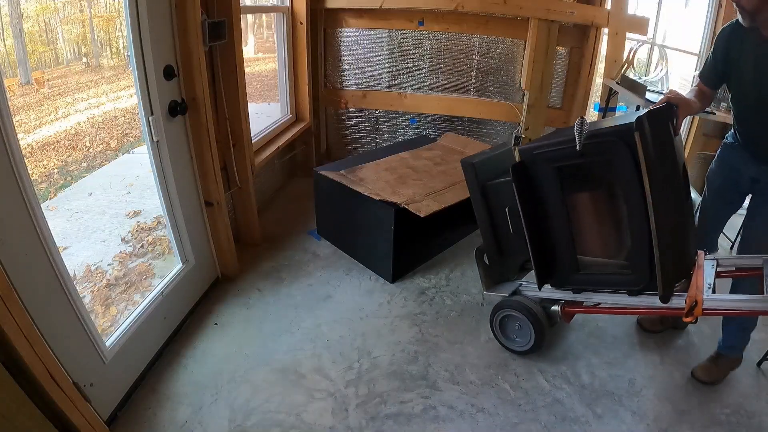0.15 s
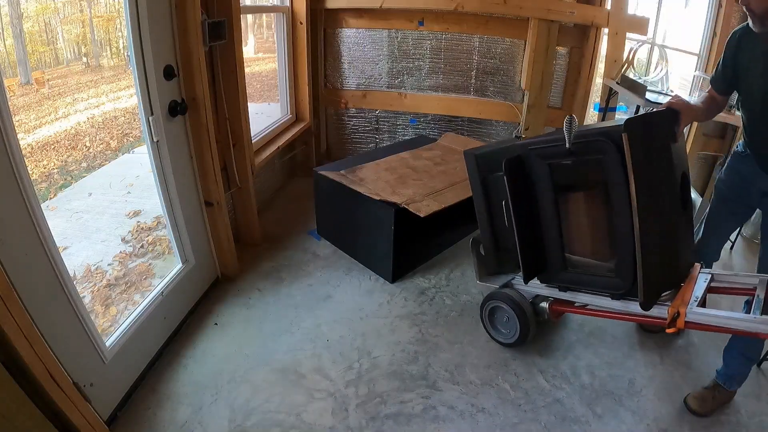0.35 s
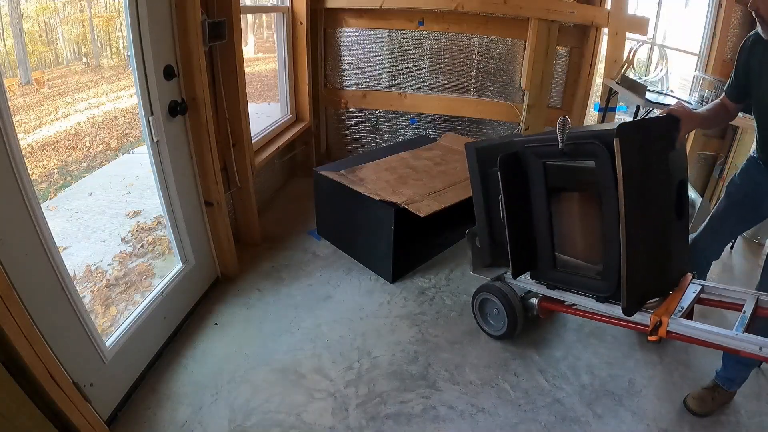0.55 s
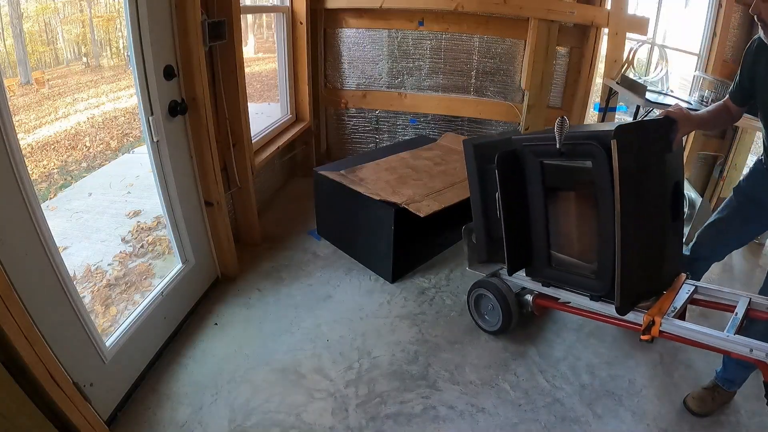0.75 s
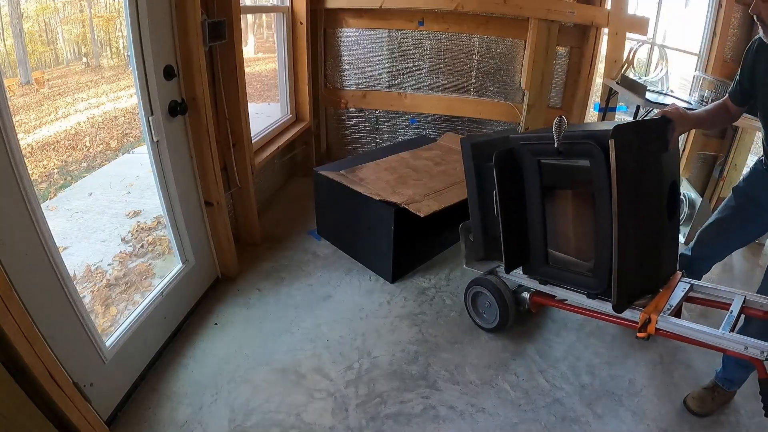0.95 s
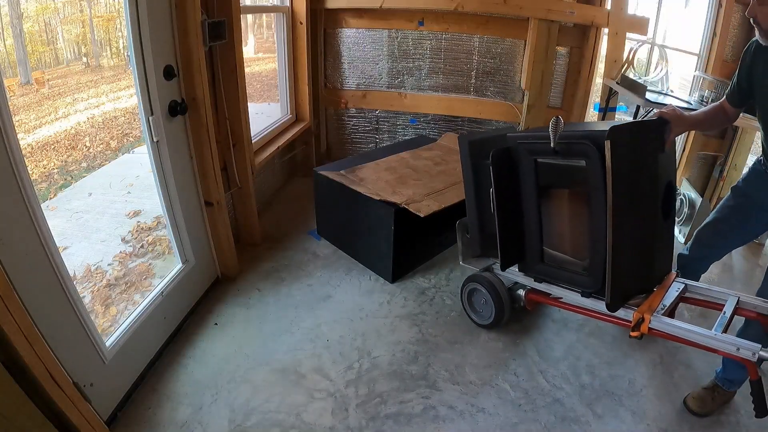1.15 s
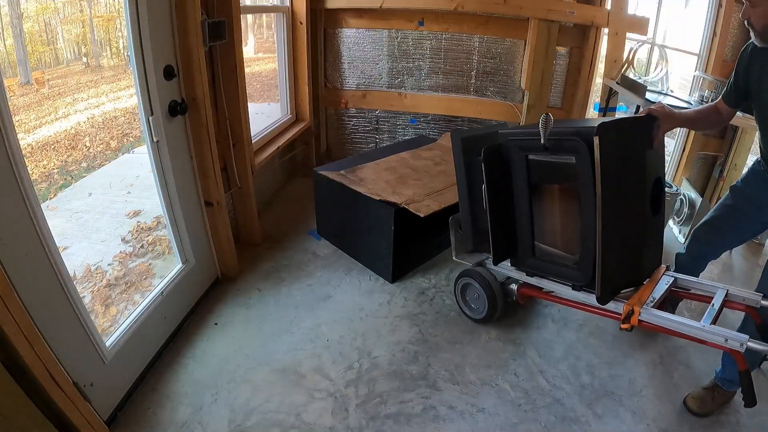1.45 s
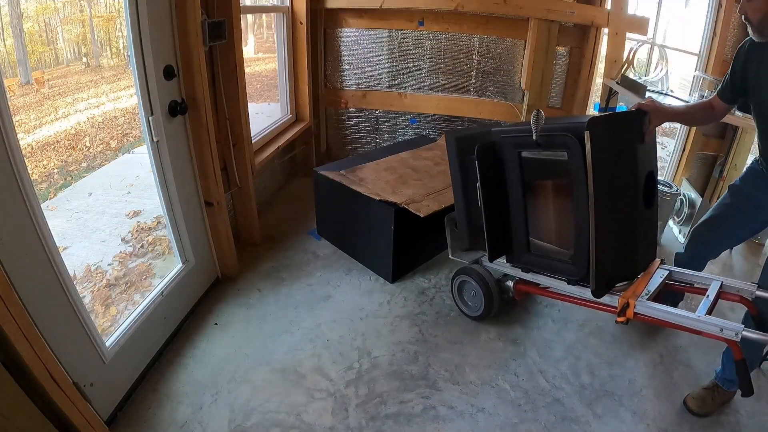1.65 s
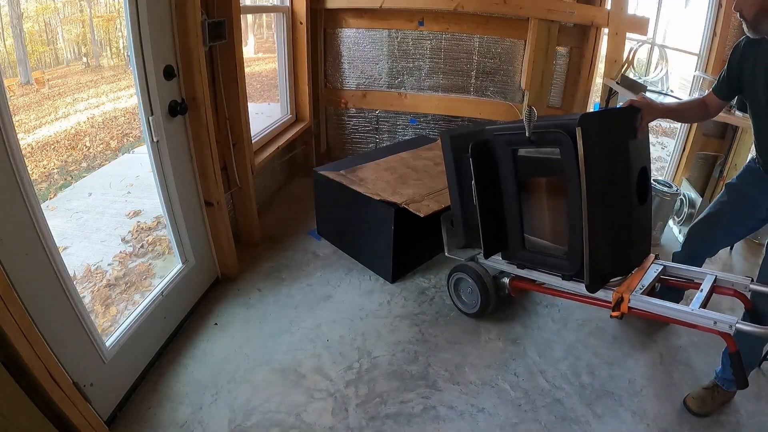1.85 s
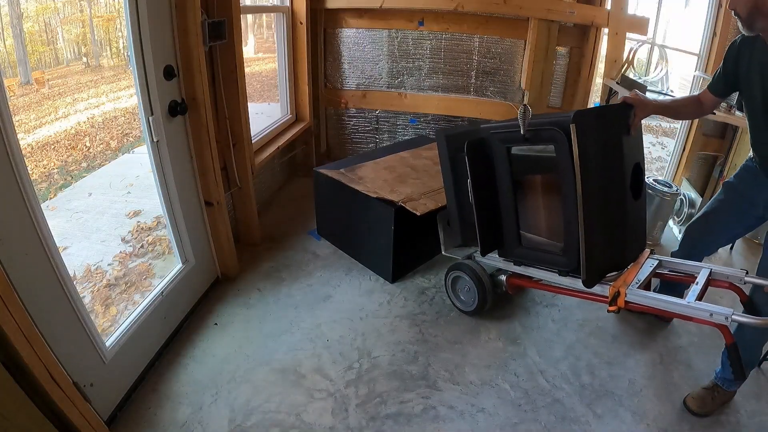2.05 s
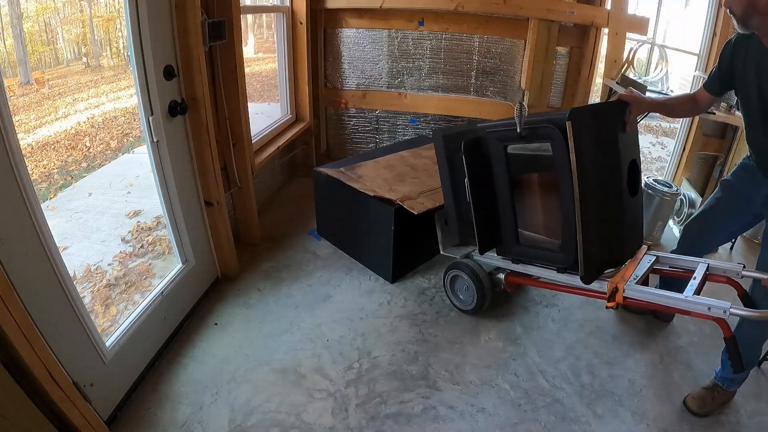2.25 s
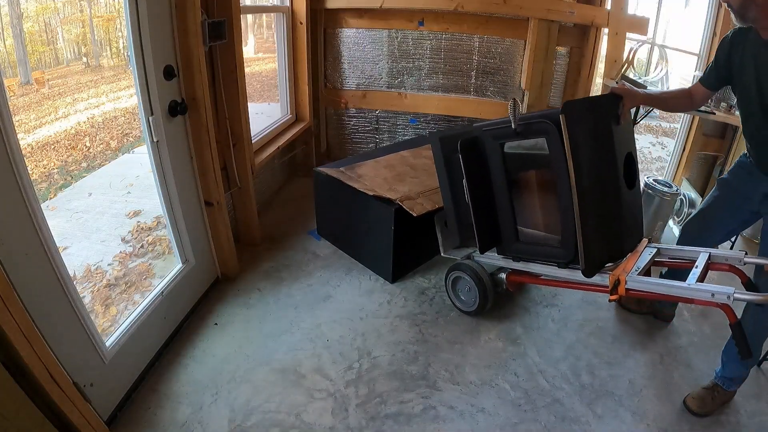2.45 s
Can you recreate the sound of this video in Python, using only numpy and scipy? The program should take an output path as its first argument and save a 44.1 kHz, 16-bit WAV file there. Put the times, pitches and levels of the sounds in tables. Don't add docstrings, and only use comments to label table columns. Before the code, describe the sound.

A loaded hand truck scrapes and rumbles on concrete, its iron load clanking, over a low hum

```python
import sys
import numpy as np
from scipy import signal
from scipy.fft import rfft, irfft
from scipy.io import wavfile
from scipy.ndimage import uniform_filter1d

SR = 44100
rng = np.random.default_rng(int(sys.argv[2]) if len(sys.argv) > 2 else 0)


def magnitude_from_level(level_db):
    exponent = np.asarray(level_db, float) / 20
    return 10 ** exponent


def pcm_store(signal):
    levels = np.round(np.clip(np.atleast_2d(signal), -1, 1) * 32767)
    wavfile.write(sys.argv[1], SR, levels.astype(np.int16).T)


N = 114660


def colour(x, table, tilt_db=0.):
    f = np.maximum(np.fft.rfftfreq(x.shape[-1], 1 / SR), 5)
    hz, db = np.array(table, float).T
    gain_db = np.interp(np.log(f), np.log(hz), db, left=-90, right=-90)
    gain_db = gain_db + tilt_db * np.log2(f / 3000)
    y = irfft(rfft(x) * magnitude_from_level(gain_db), x.shape[-1])
    return y / np.sqrt(np.mean(y ** 2))


def walk(rate_hz):
    k = int(SR / rate_hz)
    steps = np.repeat(rng.standard_normal(N // k + 1), k)
    return 1.3 * uniform_filter1d(uniform_filter1d(steps, k), k)[:N]


def fade(t, t60):
    return 10 ** (-3 * t / t60)


def ring(t, modes, stretch, tilt_db, ref_hz, scatter_db):
    hz, db, t60 = np.array(modes, float).T[:, :, None]
    level_luck, pitch_luck = rng.standard_normal((2, len(hz), 1))
    gain = magnitude_from_level(db + scatter_db * level_luck + tilt_db * np.log2(hz / ref_hz))
    tones = np.sin(2 * np.pi * hz * (1 + 0.0072 * pitch_luck) * t)
    return np.sum(gain * tones * fade(t, t60 * stretch), 0)


def add(out, s, x, db):
    i = int(max(s, 0) * SR)
    n = min(len(x), N - i)
    out[i:i + n] += x[:n] * magnitude_from_level(db) / np.max(np.abs(x))


# f/Hz, level/dB per Hz
AIR_COLOUR = [(200, -5.5), (500, -22.5), (1210, -24.5), (3500, -39), (6500, -29), (9000, -41.5),
              (13100, -42.5)]


def room_air():
    air = colour(rng.standard_normal((2, N)), AIR_COLOUR) * magnitude_from_level(-55.5 + 0.87 * walk(15.7))
    return air[0] + magnitude_from_level(-4) * air[1] * np.array([[1], [-1]])


# f/Hz, level/dB per Hz
MOTOR_MURMUR = [(25, -15), (50, 11.5), (100, 4), (170, 3.5), (220, 4), (260, 0.5), (330, -27.5), (500, -48)]
# t/s, level/dB
HUM_SWELL = [(0, -27), (.3, -31.5), (.5, -28), (.64, -39), (.82, -31.5), (.94, -30), (1.04, -37.5),
             (1.15, -32), (1.451, -32), (1.63, -34.5), (1.771, -32), (1.87, -36.5), (2.05, -33), (2.3, -38),
             (2.6, -37)]


def machine_hum():
    t = np.arange(N) / SR
    phase = 2 * np.pi * 68.0 * t + .7
    tone_db = np.interp(t, *np.array(HUM_SWELL, float).T) + 0.66 * walk(25)
    octave_db = -34 - 3 * t + walk(30.0)
    tone = magnitude_from_level(tone_db) * np.cos(phase) + magnitude_from_level(octave_db) * np.cos(2 * phase + 2.7)
    murmur = colour(rng.standard_normal((2, N)), MOTOR_MURMUR) * magnitude_from_level(1.6 * walk(6))
    side = magnitude_from_level(-53) * murmur[1] * np.array([[1], [-1]])
    return np.sqrt(2) * tone + magnitude_from_level(-41.5) * murmur[0] + side


def room(x):
    t = np.arange(SR) / SR
    bass_cut = signal.butter(2, 420, "high", fs=SR, output="sos")
    noise = signal.sosfilt(bass_cut, rng.standard_normal((2, SR)))
    low = signal.sosfilt(signal.butter(1, 1500, fs=SR, output="sos"), noise)
    tail = low * fade(t, 0.5) + (noise - low) * fade(t, 0.14)
    tail = tail * np.minimum(t / 0.001, 1)
    tail = tail / np.sqrt(np.sum(tail[0] ** 2))
    side = magnitude_from_level(-1) * signal.sosfilt(signal.butter(1, 1500, "high", fs=SR, output="sos"), tail[1])
    return np.array([signal.fftconvolve(x, tail[0] + k * side)[:N] for k in (1, -1)])


# t/s, peak level/dB, f/Hz
BUCKLE_TICKS = [
    (.2695, -17, 2300),
    (.3115, -15.5, 1900),
    (.3564, -13, 2800),
    (.743, -27, 1500),
    (.778, -28, 4200),
    (.8115, -19, 1500),
    (.9405, -25, 2400),
    (1.0305, -28, 1600),
    (1.998, -25, 1400),
]


def buckle_ticks():
    out, t = np.zeros(N), np.arange(200) / SR
    for s, db, hz in BUCKLE_TICKS:
        add(out, s, -np.sin(2 * np.pi * hz * t) * t * fade(t, .0025), db)
    return out


# t/s, peak level/dB, centre f/Hz, t60/s
SCUFF_EVENTS = [(.022, -13.5, 5600, 0.074), (0.033, -17.5, 1690, .06), (.044, -9.5, 2920, 0.085),
                (0.057, -23, 1940, 0.05), (.17, -25, 6030, 0.3), (0.288, -31, 1500, 0.083),
                (.365, -21.5, 910, 0.092), (.41, -35, 1210, 0.09), (.098, -22, 2600, 0.045),
                (.177, -21.5, 1290, 0.032), (.322, -24, 1240, 0.065), (0.744, -36, 1290, 0.052),
                (0.778, -33, 4700, 0.068), (0.8117, -23.5, 1250, 0.02), (.8345, -21, 3070, 0.096),
                (.845, -28.5, 1160, 0.039), (.94, -33.5, 2040, .08), (0.991, -30, 1470, 0.091),
                (1.03, -32, 1490, 0.091), (1.062, -52, 8600, 0.06), (1.075, -39, 1620, 0.078),
                (1.159, -21.5, 7360, 0.1), (1.16, -23.5, 3670, 0.066), (1.187, -12.5, 4360, .12),
                (1.19, -23.5, 1284, 0.33), (1.21, -40.5, 496, 0.63), (1.32, -48, 9500, .04),
                (1.408, -44, 4770, 0.069), (1.788, -49, 1500, .1), (2.006, -27.5, 2310, 0.037),
                (2.2, -27.5, 1290, 0.086), (2.296, -26, 10500, .03), (2.39, -37, 4100, .1),
                (2.51, -42, 6500, 0.46), (2.592, -40, 4870, .1), (.002, -16, 403, 0.16),
                (.028, -20, 586, 0.1), (.07, -22, 340, 0.26), (0.814, -26, 2630, 0.05),
                (.855, -24, 422, 0.19), (2.385, -29.5, 320, .3), (2.44, -30, 305, 0.35),
                (2.1, -28.5, 306, 0.16)]


def scuffs():
    out, t = np.zeros(N), np.arange(SR // 2) / SR
    f = np.fft.rfftfreq(len(t), 1 / SR)
    width, rise_s = 0.33, 0.0024
    for s, db, hz, t60 in SCUFF_EVENTS:
        resonance = 1 / (1 + ((f - hz) / (width * hz)) ** 2) ** 2
        band = irfft(rfft(rng.standard_normal(len(t))) * resonance, len(t))
        add(out, s - .001, band * np.minimum(t / rise_s, 1) * fade(t, t60), db)
    return out


def push_modes(out, s, peak_db, contact_width, tilt_db, modes):
    t = np.arange(SR // 2) / SR
    push = -np.exp(-((t[:600] - .004) / (contact_width * 0.00011)) ** 2)
    body = np.convolve(ring(t, modes, 0.94, tilt_db, 200., 2.5), push)[:len(t)]
    add(out, s - .004, body, peak_db)


# f/Hz, level/dB, t60/s
BOOT_MODES = [(97, 0, .7), (140, -6, .2), (296, -11, 1.1), (540, -22, .1), (689, -18, .1)]


def boot_step():
    out = np.zeros(N)
    push_modes(out, 1.998, -20, 2.2, 0, BOOT_MODES)
    return out


# t/s, peak level/dB, contact width in units of 0.11 ms, brightness/dB per octave
FRAME_THUMPS = [(.001, -22, 3, 3.5), (0.026, -12, 4.5, -6), (.062, -8.5, 3.1, -11), (0.086, -11, 11, -7),
                (0.182, -12.5, 3.2, -5), (0.311, -7.5, 2.3, -1), (0.356, -9, 0.8, 6), (0.406, -26, 2.2, -8),
                (.48, -10.5, 5.2, 6), (.812, -9, 8.2, 1.5), (.835, -4, 0.89, 5), (0.849, -4, 0.66, 2),
                (0.938, -36, 4.4, 5), (2.248, -38, 3, -3), (2.384, -34, 3.6, 8), (2.451, -30.5, 3.4, 11)]
# f/Hz, level/dB, t60/s
FRAME_MODES = [(45, -17, .15), (100, -14, .2), (137, 0, .24), (165, -7, .12), (220, -10, .12),
               (270, -15, .1), (315, -11, .12), (425, -15, .08), (530, -19, .1), (650, -22, .07)]


def frame_thumps():
    out = np.zeros(N)
    for s, peak, ms, tilt in FRAME_THUMPS:
        push_modes(out, s, peak - 7, ms, tilt, FRAME_MODES)
    return out


# t/s, scrape level/dB, brightness/dB per octave, rumble level/dB over scrape
ROLL_STRETCHES = [
    [(0, -26.5, 1.5, 13.5), (.02, -23.5, -0.5, -3), (.046, -18, -0.5, -6.5), (.11, -40.5, 1.5, 4),
     (.15, -37.5, 2, -4), (.186, -28.5, 3.5, -11.5), (.26, -44, -7.5, 9), (.33, -31.5, 1, -1),
     (.4, -36.5, -2.5, 4.5), (.5, -40.5, -3.5, -3)],
    [(1.98, -58.5, 3, -21), (2.008, -28.5, -0.5, -14), (2.08, -28.5, -1, -12), (2.13, -30, 0, -13),
     (2.19, -30.5, -1.5, -6), (2.3, -31.5, 0.5, -10.5), (2.34, -38.5, 2, -9), (2.4, -41, -2.5, -1.5),
     (2.46, -50.5, -0.5, 10), (2.53, -47, 2.5, -9), (2.585, -51, 1, 1), (2.6, -42, 3, -27)],
]
# f/Hz, level/dB per Hz
GRIT_COLOUR = [(300, -22.5), (530, 3.5), (750, -5.5), (1600, 2.5), (3100, -4), (4500, 0), (8000, -9.5),
               (13500, -24)]
# f/Hz, level/dB per Hz
RUMBLE_COLOUR = [(25, -24.5), (45, -19), (100, -3.5), (180, 3.5), (260, 1.5), (400, -7.5), (600, -22.5),
                 (900, -25.5)]


def rolling():
    t, out = np.arange(N) / SR, 0
    for rows in ROLL_STRETCHES:
        s, db, tilt, rumble_db = np.array(rows, float).T
        gate = np.clip((s[-1] + 0.22 - t) / 0.22, 0, 1) * (t >= s[0])
        size = magnitude_from_level(1.77 * np.minimum(rng.exponential(size=N), 3))
        size = size * (rng.random(N) < .4)
        grit = colour(size * rng.standard_normal(N), GRIT_COLOUR)
        plates = signal.fftconvolve(grit, ring(t[:SR // 4], IRON_MODES, 1.0, -1.7, 3000., 4.4))[:N]
        grit = grit + magnitude_from_level(-25) * plates / np.std(plates)
        slope = np.interp(t, s, tilt)
        below_2k = signal.sosfiltfilt(signal.butter(1, 2000, fs=SR, output="sos"), grit)
        below_6k = signal.sosfiltfilt(signal.butter(1, 6000, fs=SR, output="sos"), grit)
        bands = ((below_2k, -1.3), (below_6k - below_2k, 0), (grit - below_6k, 1.5))
        for part, octave in bands:
            level_db = np.interp(t, s, db) + 0.5 + octave * slope + 2.1 * walk(59.76)
            out = out + gate * part * magnitude_from_level(level_db)
        rumble = colour(rng.standard_normal(N), RUMBLE_COLOUR) * magnitude_from_level(3.5 * walk(24.59))
        out = out + gate * rumble * magnitude_from_level(np.interp(t, s, db + rumble_db) + 1)
    return out


# f/Hz, level/dB, t60/s
IRON_MODES = [(1206, -5, .25), (1292, -7, .36), (1744, -6, .3), (1981, -9, .33), (2541, -7, .24),
              (2896, -3, .33), (3408, -4, .16), (4200, -4, .22), (4748, -3, .24), (4915, -4, .13),
              (5168, -4, .19), (5500, -5, .14), (6848, -7, .12), (7690, -9, .17)]
# f/Hz, level/dB per Hz
PLATE_COLOUR = [(200, -17.5), (880, -15), (1180, -2), (2200, -2.5), (4700, -1), (7700, -9), (13400, -23.5),
                (16000, -61.5)]


def iron(rows, db, ring_db, rise_s):
    out, t = np.zeros(N), np.arange(SR // 2) / SR
    chatter_s = 3 * 0.011
    for s, peak, tilt, length, tick_db in rows:
        tail_noise, crack_noise, tap_noise, tick_noise = rng.standard_normal((4, len(t)))
        taps = tap_noise ** 3 * fade(t, chatter_s) * (t < chatter_s)
        modes = ring(t, IRON_MODES, .6 * min(length, 1), tilt, 3000., 3)
        bell = signal.fftconvolve(modes, taps)[:len(t)]
        bell = bell / np.max(np.abs(bell))
        tail = colour(tail_noise, PLATE_COLOUR, tilt - 1.5) * fade(t, 0.3 * length)
        crack = magnitude_from_level(4.5) * colour(crack_noise, PLATE_COLOUR, tilt) * fade(t, 0.087 * length)
        hiss = (tail + crack) * np.minimum(t / rise_s, 1)
        tick_shape = (t / rise_s) ** 2 * np.exp(2 - 2 * t / rise_s)
        tick = magnitude_from_level(tick_db) * colour(tick_noise, PLATE_COLOUR, tilt) * tick_shape
        add(out, s - .001, magnitude_from_level(ring_db) * bell + (hiss + tick) / 4, peak + db)
    return out


# t/s, peak level/dB, brightness/dB per octave, ring length factor, tick level/dB
RATTLE_EVENTS = [(.246, -20.5, 1, 0.43, -16), (.2695, -17.5, -7.5, 0.83, 4), (.3117, -10.5, -6.5, 0.58, 12),
                 (.3566, -17, -13, 0.91, -7), (.7423, -23.5, -2, 0.64, 11), (.7783, -24, -1, 2.9, 9),
                 (.8115, -13.5, -9, 0.51, -23), (.834, -15, -8, 1.27, -14), (.8864, -25.5, -0.5, 0.9, -2),
                 (.9400, -22.5, -1.5, 0.63, 0), (.9892, -19, -5.5, 0.74, 5), (1.0297, -24.5, -5, .7, -1),
                 (1.09, -45, 8, 4.6, -19.5), (1.4874, -47, 14, 0.75, 0), (2.1971, -12, -3.5, 1.2, 8.5),
                 (2.2942, -32, 12, 0.51, -5)]


def rattles():
    return iron(RATTLE_EVENTS, db=-4.5, ring_db=-11, rise_s=.0016)


# t/s, peak level/dB, brightness/dB per octave, ring length factor, tick level/dB
CLANK_EVENTS = [
    (.5092, -4.5, 1, 1.13, 8),
    (.6281, -12, 0, 1.45, 3),
    (1.1594, -19.5, 2.5, 1, -9),
    (1.1855, -6, 1, 1.04, 0.5),
    (1.7856, -39.5, 1, 2.9, -9),
    (1.889, -43.5, 9, 1.5, -13),
]


def clanks():
    return iron(CLANK_EVENTS, db=-1, ring_db=-6, rise_s=0.0023)


def scene():
    truck = clanks() + rattles() + frame_thumps() + boot_step() + buckle_ticks() + rolling() + scuffs()
    ports = magnitude_from_level(-27.5) * np.diff(np.roll(truck, 5), prepend=0) * np.array([[1], [-1]])
    return truck + ports + magnitude_from_level(-7.5) * room(truck) + machine_hum() + room_air()


def top_cut(x):
    return signal.sosfilt(signal.butter(12, 15300, fs=SR, output="sos"), x)


def record(dry):
    mix = signal.sosfilt(signal.butter(2, 32, "high", fs=SR, output="sos"), dry)
    return top_cut(mix)


dry = scene()
out = record(dry)
pcm_store(out)
```